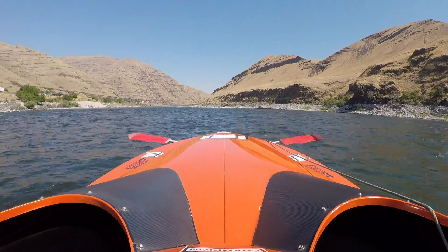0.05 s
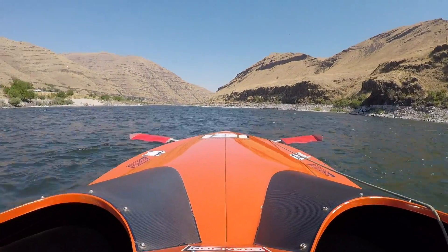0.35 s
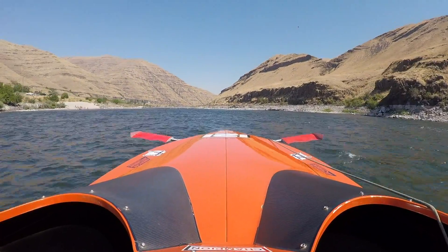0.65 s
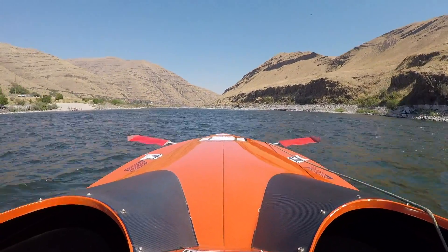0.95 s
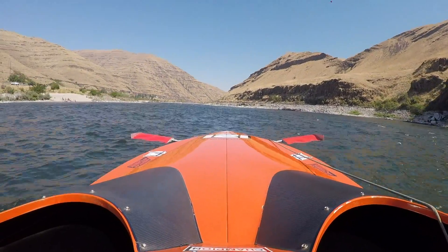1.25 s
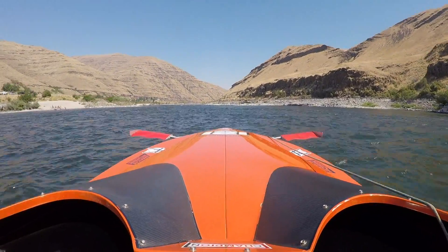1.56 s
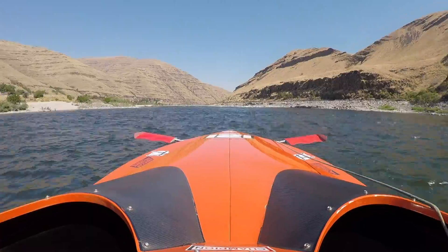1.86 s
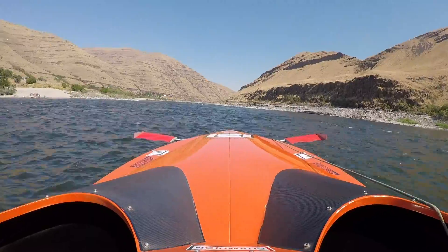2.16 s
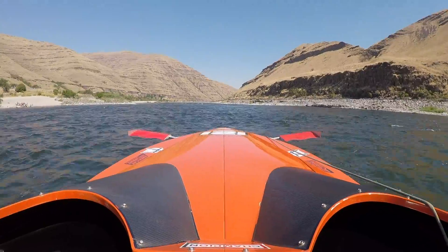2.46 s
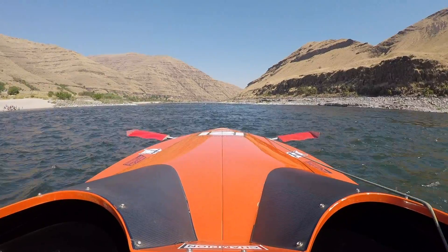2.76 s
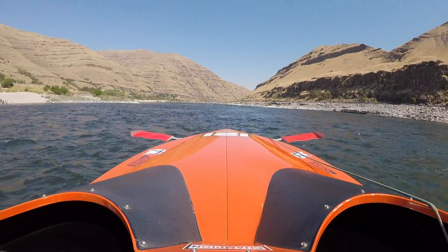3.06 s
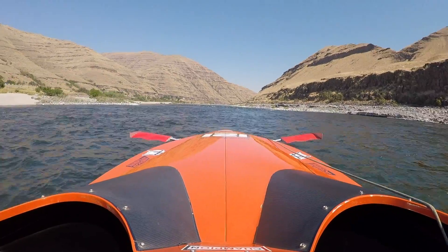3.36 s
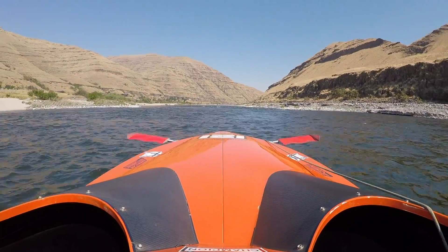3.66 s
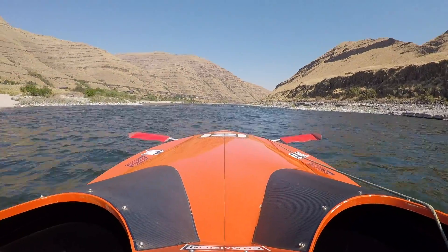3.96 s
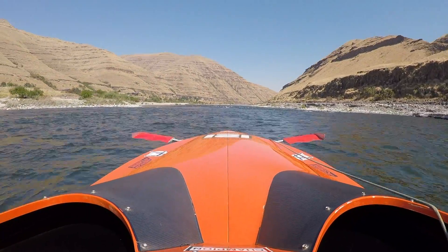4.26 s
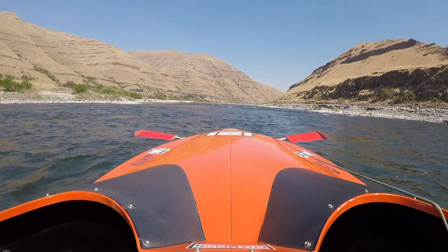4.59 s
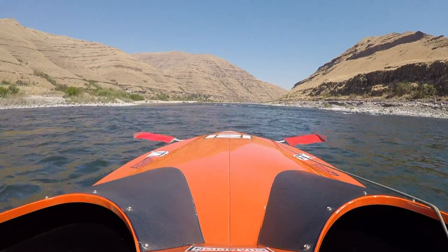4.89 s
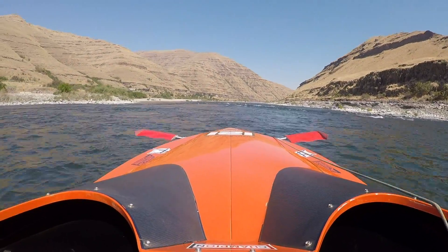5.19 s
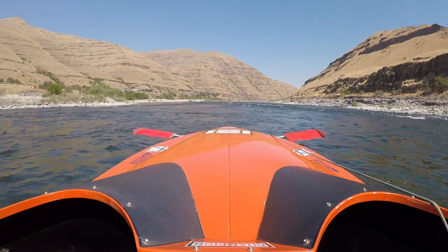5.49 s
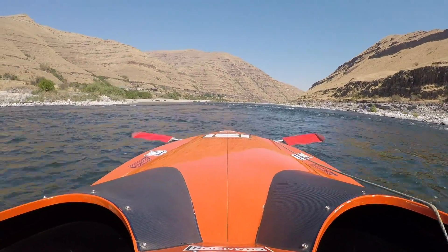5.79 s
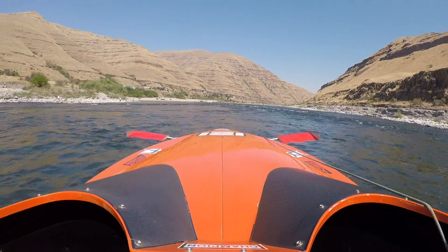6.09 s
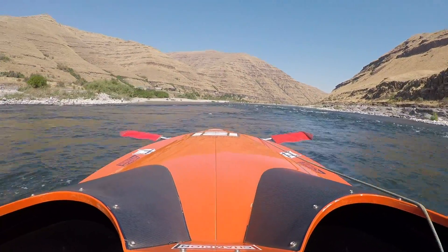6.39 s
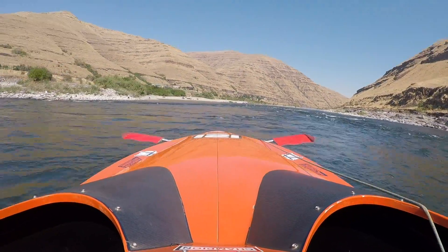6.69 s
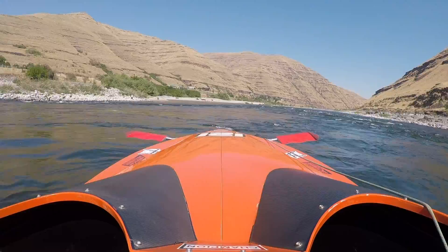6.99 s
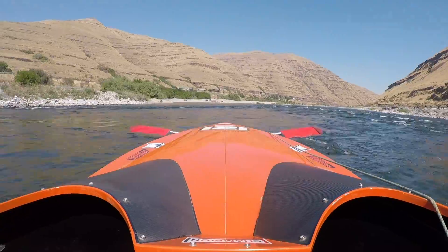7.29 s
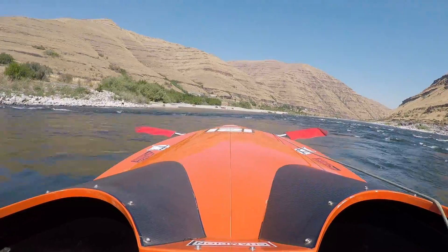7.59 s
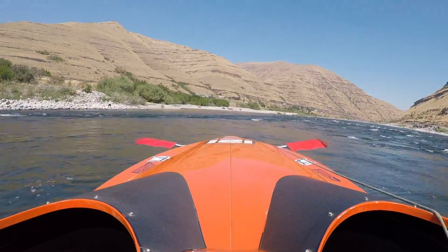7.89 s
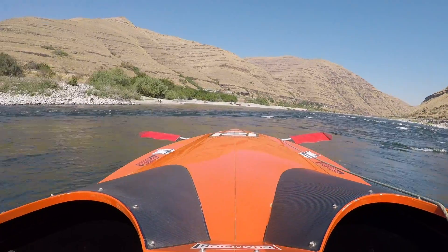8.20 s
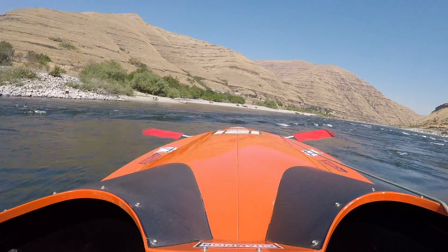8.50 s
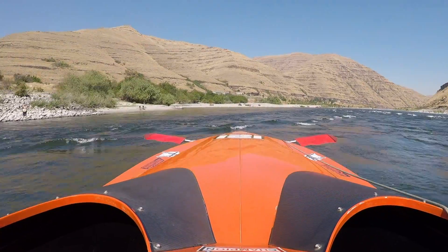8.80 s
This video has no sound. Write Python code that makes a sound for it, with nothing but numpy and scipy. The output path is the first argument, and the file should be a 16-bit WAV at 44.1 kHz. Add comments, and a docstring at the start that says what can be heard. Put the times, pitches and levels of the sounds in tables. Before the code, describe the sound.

Heard from aboard, a speeding jet boat's engine drones, dips and flares while wind buffets and water sprays and slaps the hull.

```python
"""A racing jet boat's eight-cylinder engine, heard from just behind the bow on a run up a river.
Firing pulses ring and rasp through the exhaust pipes: the engine holds a hard note, eases off into a
burble, blips, flares as the pump loses its bite, and pulls again. Wind buffets the microphone, the hollow
hull booms over the chop, spray hisses along the sides and stray drops splat on the deck.
Some six seconds in, the boat leans into a bend, where water churns and slaps against the hull."""
import sys
import numpy as np
from scipy import signal
from scipy.fft import rfft, irfft, next_fast_len
from scipy.io import wavfile
from scipy.ndimage import uniform_filter1d, minimum_filter1d

SR = 44100
rng = np.random.default_rng(int(sys.argv[2]) if len(sys.argv) > 2 else 0)


def inscribe(sig):
    """Save sig as 16-bit PCM at rate SR to the path in sys.argv[1].

    A 1-D sig is mono; a 2-D sig holds one channel per row.
    Samples are clipped to [-1, 1] before scaling.
    """
    pcm = np.round(np.clip(np.atleast_2d(sig).T, -1, 1) * 32767)
    wavfile.write(sys.argv[1], SR, pcm.astype(np.int16))


N = 399105
TIME = np.arange(N) / SR

# Table levels are relative: each layer adds its own trim.
# engine speed as firings a second: t/s, f/Hz
FIRING_RATE = [(0.0, 301.0), (0.16, 306.6), (0.5, 303.5), (0.63, 317.4), (0.75, 324.0), (0.95, 323.1),
               (1.02, 316.3), (1.15, 309.5), (1.4, 326.1), (1.67, 330.9), (1.97, 312.4), (2.35, 316.4),
               (2.56, 304.4), (2.61, 303.7), (2.85, 311.6), (3.18, 309.0), (3.33, 311.6), (3.49, 307.2),
               (3.67, 305.4), (3.86, 301.2), (4.04, 306.2), (4.2, 305.2), (4.3, 300.7), (4.52, 298.1),
               (4.77, 274.7), (5.01, 266.8), (5.16, 258.4), (5.25, 256.6), (5.49, 279.7), (5.55, 273.0),
               (5.7, 244.6), (5.8, 232.4), (5.9, 246.1), (6.08, 279.7), (6.22, 291.1), (6.31, 292.9),
               (6.69, 292.5), (7.14, 308.8), (7.29, 329.0), (7.39, 337.4), (7.5, 355.2), (7.53, 352.6),
               (7.62, 314.0), (7.75, 293.7), (7.78, 290.4), (8.09, 283.5), (8.28, 284.2), (8.59, 299.0),
               (8.78, 295.1), (9.05, 295.0)]
# the burn, even under power and rough off the throttle: t/s, roughness/0-1
BURBLE = [(0, .45), (.5, .4), (.7, .15), (4.5, .15), (4.8, .7), (5.25, .6), (5.4, .4), (5.6, .7), (5.9, .7),
          (6.2, .15), (7.5, .1), (7.7, .6), (8.1, .6), (8.4, .15)]
# cylinders in firing order: pulse level/dB, extra travel through its own pipe/s
CYLINDERS = [(0, 0), (-11, .00031), (-9, .00066), (-12, .00012), (-9, .00048), (-3, .00037), (-13, .00075),
             (-10, .0002)]
# the note as speed sweeps it across the pipes' resonances: firing f/Hz, tone level/dB, octave level/dB
NOTE_LEVELS = [(235, -17.5, -27), (262, -16.8, -34), (278, -15.3, -29), (286, -13.8, -27),
               (292, -13.2, -18.5), (299, -13.5, -18.2), (304, -14, -22.8), (309, -14, -27.8),
               (314, -13.9, -32), (323, -13.5, -30), (330, -14.2, -29), (338, -13.2, -32),
               (355, -10.5, -26)]
# stumbles in the note, nearly all dips: start t/s, end t/s, level change/dB
STUMBLES = [(4.8, 4.87, -5), (5.15, 5.23, 1), (5.66, 5.74, -22), (5.91, 5.98, -1), (6.55, 6.68, -3.5),
            (7.83, 8.11, -2.5)]
# narrow resonances of the exhaust pipes: f/Hz, width/Hz, boost/dB
PIPE_RINGS = [(358.5, 34, 8), (399, 29, 7), (460, 13, 5.5), (556, 75, 12), (699, 22, 7.5), (778, 51, 7),
              (964, 16, 2.5), (1082, 85, 5), (1180, 37, 5), (1268, 31, 4.5), (1353, 70, 7.5), (1520, 48, 4)]
# exhaust faders: t/s, bark level/dB, rasp level/dB, snarl level/dB
EXHAUST_LEVELS = [(0.0, -44, -41, -62), (0.42, -40, -41, -58), (0.85, -33.5, -43, -49.5),
                  (1.12, -35, -41.5, -53.5), (1.65, -35, -44, -49.5), (2.1, -35.5, -43.5, -52),
                  (2.55, -35.5, -41.5, -53.5), (3.2, -32.5, -41, -53.5), (4.15, -29.5, -38, -52),
                  (4.6, -30, -41, -56.5), (5.05, -34.5, -42.5, -54.5), (5.35, -38.5, -41.5, -48.5),
                  (5.7, -36.5, -40.5, -55), (6.15, -36, -40, -48.5), (6.45, -29, -38, -44.5),
                  (6.85, -28.5, -41, -60), (7.12, -29.5, -37.5, -52), (7.3, -24, -43, -52),
                  (7.39, -39, -36, -46.5), (7.47, -38, -35, -45), (7.62, -24.5, -37.5, -48),
                  (7.8, -30, -41, -57), (8.0, -30.5, -43.5, -50), (8.3, -33, -44, -51),
                  (8.55, -30.5, -40, -44), (8.66, -30.5, -40, -51), (8.76, -29, -42, -56),
                  (9.05, -26, -41, -49)]
# engine partials: multiple of the engine cycle, level/dB
GROWL_ORDERS = [(7, -16.5), (9, -19), (10, -17), (11, -17), (12, -13.5), (13, -21), (14, -18), (15, -23),
                (17, -29), (18, -22), (19, -23.5)]  # left by unequal cylinders
SNARL_ORDERS = [(20, 2), (21, 2.5), (22, 5), (23, 3.5), (24, 4), (25, 1), (26, 5.5), (27, 4), (28, 4),
                (29, 1), (30, 3.5), (31, 3), (32, 2), (33, -1), (34, -3), (35, 1), (36, -1), (37, -1.5),
                (38, -3.5), (39, -5.5), (40, -4), (41, -5.5), (42, -5), (43, -6.5), (44, -7.5), (45, -6),
                (47, -14), (49, -14), (52, -16), (54, -16), (58, -17)]  # the top of the exhaust
THROB_ORDERS = [(2, 2.5), (3, -4.5), (4, -14.5), (5, -11.5)]  # the lowest, felt in the hull
# shifts in the snarl: multiple of the engine cycle, level change/dB
SNARL_LABOUR = [(22, -2), (23, 2), (24, 5.5), (26, -8), (28, -7), (29, -3), (31, -7), (36, -2), (37, 3),
                (42, 3)]  # deeper as the engine labours
SNARL_FLARE = [(24, 4.5), (29, 5), (39, 5), (47, 13), (49, 13), (52, 11), (54, 13), (58, 14)]  # harder as the pump runs free
# EQ curves: f/Hz, level/dB
ROAR_EQ = [(100, -17), (190, -7.5), (260, -6), (360, -3.5), (480, -7.5), (620, -10.5), (740, -16),
           (900, -22.5), (1400, -21.5), (3000, -86), (9000, -100)]  # low rush of exhaust gas
BARK_EQ = [(350, -30), (650, -4), (790, 1), (920, -3), (1080, 1), (1370, 1.5), (1520, -5), (1750, -11.5),
           (2200, -17), (2800, -23), (3500, -33), (12000, -100)]  # midrange of the pipes
BARK_HOLLOW_EQ = [(350, -29), (600, -2), (800, 2.5), (920, -4.5), (1080, -2.5), (1370, -2.5), (1520, -4.5),
                  (1750, -10.5), (2200, -16), (2800, -21.5), (3500, -33.5), (12000, -100)]  # the pipes at low revs
RASP_EQ = [(1100, -20), (1700, 1), (2200, 0), (2800, -4.5), (3400, -12), (4200, -24), (8000, -48),
           (13000, -80)]  # gas tearing out
WIND_EQ = [(8, -32), (22, -8), (35, -2.5), (50, 2), (80, 2), (110, 0), (180, -10), (260, -12.5), (400, -17),
           (1000, -79.5), (6000, -110)]  # deep buffeting
CHURN_EQ = [(110, -25), (190, -8), (245, 0), (330, -5), (600, -25), (4000, -100)]  # water churning in the bend
HULL_EQ = [(60, -25.5), (100, -12.5), (118, -3), (137, 8), (155, -1), (180, -4.5), (220, -11.5),
           (400, -77.5), (3000, -115)]  # the hollow hull's resonance
SPRAY_FAST_EQ = [(1500, -15), (3500, 0), (5500, -1.5), (6500, -2), (7500, 0), (8500, -3.5), (9500, -7.5),
                 (11500, -20.5), (14000, -37)]  # broad hiss at speed
SPRAY_SLOWING_EQ = [(1500, -18), (3500, -3), (5000, -4.5), (6000, -2.5), (7000, 2), (7800, 1.5), (8600, -5),
                    (9500, -12.5), (11500, -25), (14000, -41)]  # narrow sizzle as the boat loses way
SPRAY_BEND_EQ = [(1500, -20), (4500, -9), (5500, -3), (6500, 1), (7500, -1), (8500, -8), (10500, -21),
                 (11700, -31), (14000, -52)]  # duller hiss in the bend
SPLAT_EQ = [(1500, -20), (4300, 1), (7500, 0), (10000, -17), (14000, -46)]  # bright drop on the deck
SLAP_EQ = [(100, -9.5), (350, -10.5), (800, -5.5), (1400, -10), (2000, -16), (2800, -18), (3400, -37),
           (12000, -82.5)]  # dull wave against the hull
# swells and dips in the rumble: start t/s, end t/s, level change/dB
GUSTS = [(2.45, 2.54, 5.5), (3.27, 3.38, 8), (4.1, 4.19, 9.5), (4.5, 4.58, 3), (4.8, 5.75, 1.5),
         (5.96, 6.05, 11)]  # the wind surges
LULLS = [(4.17, 4.28, -5.5), (7.45, 7.56, -14), (8.216, 8.6, -16), (8.6, 8.945, 0), (8.945, 9.3, -20)]  # wind and hull drop away
# water thrown up by the hull: t/s, level/dB
SPRAY_LEVEL = [(0.0, -52.0), (1.8, -53.5), (2.6, -51.5), (4.3, -51.5), (4.55, -53.5), (5.02, -48.5),
               (5.4, -50.0), (6.11, -47.2), (6.13, -50.8), (6.85, -52.0), (7.3, -49.5), (7.85, -56.5),
               (8.2, -52), (8.55, -50), (8.7, -53.5), (9.05, -52.0)]
# water hits: t/s, level/dB
DECK_DROPS = [(2.5321, -33), (4.979, -36), (5.006, -32), (5.0374, -32), (5.0739, -33), (5.3702, -34),
              (5.649, -36), (5.687, -33), (5.71, -37), (5.732, -33), (5.8421, -29), (5.894, -26),
              (5.913, -31), (5.931, -32), (6.051, -25), (6.083, -33), (6.101, -28), (8.8424, -30)]
HULL_SLAPS = [(6.472, -30), (6.503, -44), (6.597, -36), (6.718, -29), (7.253, -28), (7.622, -27),
              (7.709, -25.5), (7.775, -28), (7.82, -32), (7.873, -29), (8.055, -29), (8.591, -32),
              (8.726, -25.5), (8.765, -38), (8.832, -27)]

BEND_S = 6.13  # the boat enters the bend
LEAN_START_S, LEAN_SETTLE_S = 5.93, 0.85


def amp(db):
    """Decibels to gain."""
    return 10 ** (np.asarray(db) / 20)


def unit(x):
    """Scales to rms 1."""
    return x / np.sqrt(np.mean(x ** 2) + 1e-20)


def curves(table):
    """Each column of a timed table, sample by sample."""
    times, *columns = np.transpose(table)
    return [np.interp(TIME, times, column) for column in columns]


def spans(table, edge_s=0.13):
    """A fader move in dB that dips or swells over each row's span, with sloping edges."""
    return sum(db * np.clip(np.minimum(TIME - start, end - TIME) / edge_s + .5, 0, 1)
               for start, end, db in table)


def colour(x, eq):
    """Minimum-phase EQ, so that pulses ring after they strike; rms 1."""
    size = next_fast_len(N + 8192)
    hz, db = np.transpose(eq)
    bin_hz = abs(np.fft.fftfreq(size, 1 / SR))
    log_gain = np.log(amp(np.interp(np.log(bin_hz + 1), np.log(hz), db)))
    response = np.exp(np.conj(signal.hilbert(log_gain)))[:size // 2 + 1]
    return unit(irfft(rfft(x, size) * response, size)[:N])


def noise():
    """White noise."""
    return rng.standard_normal(N)


def wander(rate_hz):
    """Smooth random modulation of rms 1, rolling off above the given rate."""
    size, control_hz = 8192, 800
    hz = np.fft.rfftfreq(size, 1 / control_hz)
    slow = irfft(rfft(rng.standard_normal(size)) / np.sqrt(1 + (hz / rate_hz) ** 6))
    return unit(np.interp(TIME * control_hz, np.arange(size), slow))


def bend():
    """Quick crossfade from 0 on the straight to 1 in the bend."""
    return np.clip((TIME - BEND_S) / .06 + .5, 0, 1)


def partial(cycles, order, slip_rad, rate_hz, flutter_db=0):
    """One multiple of the engine cycle; uneven burns make its phase slip and can flutter its level."""
    phase = 2 * np.pi * (order * cycles + rng.random()) + slip_rad * wander(rate_hz)
    flutter = unit(amp(flutter_db * np.tanh(wander(rate_hz))))
    return np.sqrt(2) * np.sin(phase) * flutter


def pipe_boost_db(order, firing_hz):
    """The lift a partial gets as the revs sweep it across the pipes' resonances."""
    grid_hz = np.linspace(0, 3000, num=1500)
    boost_db = sum(db / (1 + (2 * (grid_hz - hz) / width) ** 2) for hz, width, db in PIPE_RINGS)
    return np.interp(order * firing_hz / len(CYLINDERS), grid_hz, boost_db)


def firing_pulses(cycles, burble, scatter_db=4, jitter_s=.00011, drift_s=.00006):
    """One pulse per firing: two cylinders stand out, and uneven burns scatter strength and timing."""
    count = len(CYLINDERS)
    firing = np.arange(int(cycles[-1] * count))
    strength_db, travel_s = np.array(CYLINDERS)[firing % count].T
    late, strong = rng.standard_normal((4000, 2))[firing].T
    fired_s = np.interp(firing / count, cycles, TIME)
    rough = np.interp(fired_s, TIME, burble)
    # the travel time in each pipe drifts with the heat of its gas
    drift = np.array([np.interp(fired_s, TIME, wander(1)) for _ in CYLINDERS])[firing % count, firing]
    arrival_s = fired_s + travel_s + drift_s * drift + jitter_s * rough * late
    at = np.clip(np.round(arrival_s * SR).astype(int), 0, N - 1)
    return np.bincount(at, amp(strength_db + scatter_db * rough * strong), N)


def firing_note(cycles, firing_hz, burble, trim_db=.5, flutter_db=4, waver_db=1.18):
    """The exhaust's note: one wave per firing plus its octave, softer and shakier off the throttle."""
    phase = 2 * np.pi * cycles * len(CYLINDERS) + .13 * burble * wander(22)
    hz, *columns = np.transpose(NOTE_LEVELS)
    tone_db, octave_db = [np.interp(firing_hz, hz, db) for db in columns]
    grit = np.interp(octave_db, (-28, -18), (.4, 0))  # the octave is rough while weak
    tone_db += 1.46 * bend() - 3.5 * burble + waver_db * wander(5)
    octave_db -= burble
    note = 0
    for harmonic, db, rough in (1, tone_db, 0), (2, octave_db, grit):
        gain = amp(db + trim_db + flutter_db * (burble + rough) * wander(24))
        note += gain * np.sin(harmonic * phase + rough * wander(22))
    return np.sqrt(2) * amp(spans(STUMBLES, edge_s=.03)) * note


def misfires(cycles, burble, level_db=-15, width_hz=80):
    """Off the throttle the burns come unevenly and sputter around the firing rate."""
    phase = 2 * np.pi * cycles * len(CYLINDERS)
    sputter = wander(width_hz) * np.sin(phase) + wander(width_hz) * np.cos(phase)
    return amp(level_db) * burble ** 2 * sputter


def growl(cycles, firing_hz, burble, level_db=-21, roar_db=-.5, pull_db=.5, full_pull_hz_per_s=37):
    """Unequal cylinders leave wavering partials around the note, over the roar of the gas."""
    partials = 0
    for order, db in GROWL_ORDERS:
        waver_db = 2 * np.tanh(wander(5))
        gain = amp(db + waver_db + pipe_boost_db(order, firing_hz))
        partials += gain * partial(cycles, order, slip_rad=.25 + .3 * burble, rate_hz=7.3)
    roar = amp(roar_db) * colour(noise(), ROAR_EQ)
    # a touch louder as the revs climb, a little softer in the lulls
    pull = uniform_filter1d(np.clip(np.gradient(firing_hz) * SR / full_pull_hz_per_s, 0, 1), SR // 4)
    return amp(level_db + pull_db * pull + .17 * spans(LULLS)) * (partials + roar)


def bark(pulses, firing_hz, burble, trip_s=.0021, reflection=.5, hollow_hz=(280, 300)):
    """Pulses bounce along the pipes and ring there with turbulent gas, hollower at low revs."""
    loop = np.r_[1, np.zeros(round(trip_s * SR)), reflection]
    ringing = unit(signal.lfilter(loop[::-1], loop, pulses))  # all-pass: smears without colouring
    gas = .7 + .8 * burble
    drive = (ringing + gas * noise()) / np.sqrt(1 + gas ** 2)
    hollow = np.interp(firing_hz, hollow_hz, (1, 0))
    return (1 - hollow) * colour(drive, BARK_EQ) + hollow * colour(drive, BARK_HOLLOW_EQ)


def snarl(cycles, firing_hz, labour_hz=(291, 299), flare_hz=(332, 350)):
    """Upper partials catch the pipes' resonances: deep when labouring, hard when the pump runs free."""
    labour = np.interp(firing_hz, labour_hz, (1, 0))
    flare = np.interp(firing_hz, flare_hz, (0, 1))
    partials = 0
    for order, db in SNARL_ORDERS:
        load_db = labour * dict(SNARL_LABOUR).get(order, 0) + flare * dict(SNARL_FLARE).get(order, 0)
        gain = amp(db + load_db + pipe_boost_db(order, firing_hz))
        partials += gain * partial(cycles, order, slip_rad=.35, rate_hz=9, flutter_db=3.5)
    return partials


def rasp(pulses, puff_s=.004, steady_flow=.4):
    """Gas tears out of the pipes in a puff after each pulse."""
    puffs = unit(signal.lfilter([1], [1, -np.exp(-1 / (puff_s * SR))], pulses))
    return colour(noise() * (steady_flow + puffs), RASP_EQ)


def engine(cycles, firing_hz, bark_trim_db=-.4, rasp_trim_db=-1):
    """The exhaust mix, low to high, every layer following one crankshaft."""
    bark_db, rasp_db, snarl_db = curves(EXHAUST_LEVELS)
    burble, = curves(BURBLE)
    pulses = firing_pulses(cycles, burble)
    return (firing_note(cycles, firing_hz, burble)
            + misfires(cycles, burble)
            + growl(cycles, firing_hz, burble)
            + amp(bark_db + bark_trim_db) * bark(pulses, firing_hz, burble)
            + amp(snarl_db) * snarl(cycles, firing_hz)
            + amp(rasp_db + rasp_trim_db) * rasp(pulses))


def ride_db(chop_db=.1, chop_hz=.39):
    """The ride over the water: a faint sway from the chop, and deep dips in the lulls."""
    return chop_db * wander(chop_hz) + spans(LULLS)


def buffeting(lean, level_db=-17.5, lean_db=6, lump_db=2.5, churn_db=-4.5):
    """Lumpy wind hits the microphone; in the bend it grows and churning water joins it."""
    wind = colour(noise() * amp(lump_db * wander(12)), WIND_EQ)
    churn = amp(churn_db) * bend() * colour(noise() * amp(lump_db * wander(19)), CHURN_EQ)
    return amp(level_db + lean_db * lean ** 2 + spans(GUSTS) + ride_db()) * (wind + churn)


def hull_boom(cycles, firing_hz, lean, level_db=-13, lean_db=-6.5):
    """Chop drums the hollow hull and the engine throbs in it, less once the boat carves the bend."""
    drumming = colour(noise(), HULL_EQ)
    throb = 0
    for order, db in THROB_ORDERS:
        resonance_db = np.interp(order * firing_hz / len(CYLINDERS), *np.transpose(HULL_EQ))
        throb += amp(db + resonance_db) * partial(cycles, order, slip_rad=.4, rate_hz=5.6)
    return amp(level_db + lean_db * lean + ride_db()) * (drumming + throb)


def spray(trim_db=2.03, droplets_per_s=700, grain=.62, flicker_db=1, slowing_s=(2.3, 6.3)):
    """Sheets of water hiss off the hull, shedding a fizz of droplets."""
    level_db, = curves(SPRAY_LEVEL)
    sizes = amp(3.2 * np.minimum(rng.exponential(1, N), 4))
    droplets = unit(sizes * np.sign(noise()) * (rng.random(N) < droplets_per_s / SR))
    water = (noise() + grain * droplets) * amp(flicker_db * wander(46))
    slowing = np.interp(TIME, slowing_s, (0, 1))
    straight = (1 - slowing) * colour(water, SPRAY_FAST_EQ) + slowing * colour(water, SPRAY_SLOWING_EQ)
    hiss = (1 - bend()) * straight + bend() * colour(water, SPRAY_BEND_EQ)
    return amp(level_db + trim_db) * hiss


def deck_drops(trim_db=-10, splat_s=.0026, scatter_db=-9, scatter_s=.013):
    """Single drops splat on the deck close by and scatter into a brief splash."""
    envelope = 0
    for start, db in DECK_DROPS:
        age = abs(TIME - start)
        decay = np.exp(-age / splat_s) + amp(scatter_db) * np.exp(-age / scatter_s)
        envelope += amp(db) * (TIME >= start) * decay
    return amp(trim_db) * envelope * colour(noise(), SPLAT_EQ)


def hull_slaps(trim_db=3, attack_s=.008, decay_s=.026):
    """Each wave that meets the leaning hull bursts into a short, dull splash."""
    envelope = 0
    for start, db in HULL_SLAPS:
        age = TIME - start
        envelope += amp(db) * np.clip(age / attack_s, 0, 1) * np.exp(-abs(age - attack_s) / decay_s)
    return amp(trim_db) * envelope * colour(noise(), SLAP_EQ)


def scene():
    """Engine, wind, hull and water, mixed in mono."""
    firing_hz, = curves(FIRING_RATE)
    cycles = np.cumsum(firing_hz) / SR / len(CYLINDERS)  # each cylinder fires once a cycle
    lean = np.clip((TIME - LEAN_START_S) / LEAN_SETTLE_S, 0, 1)
    exhaust = engine(cycles, firing_hz)
    rumble = buffeting(lean) + hull_boom(cycles, firing_hz, lean)
    water = spray() + deck_drops() + hull_slaps()
    return (exhaust + rumble + water)[None]


def record(dry):
    """A fast limiter ducks the mix under the biggest thumps; a low-pass trims the very top."""
    ceiling_db, cutoff_hz = -.7, 14800
    needed_gain = np.minimum(1, amp(ceiling_db) / (abs(dry[0]) + 1e-9))
    held_gain = minimum_filter1d(needed_gain, size=900)
    gain = uniform_filter1d(uniform_filter1d(held_gain, size=450), size=450)
    lowpass = signal.firwin(255, cutoff_hz, window=("kaiser", 9), fs=SR)
    return signal.oaconvolve(dry * gain, lowpass[None], "same")


dry = scene()
out = record(dry)
inscribe(out)
```